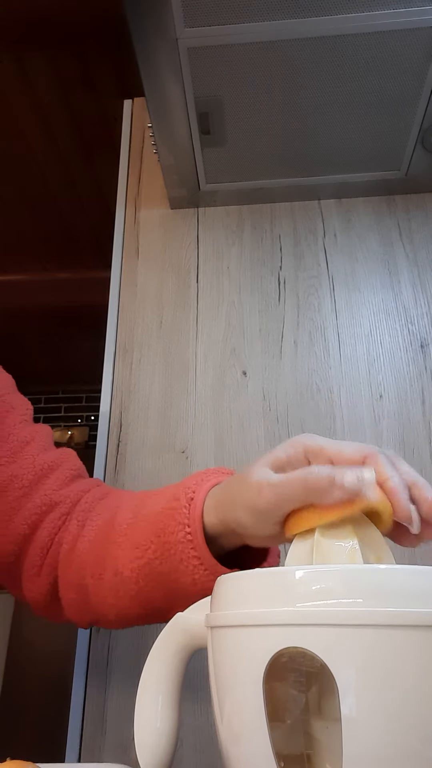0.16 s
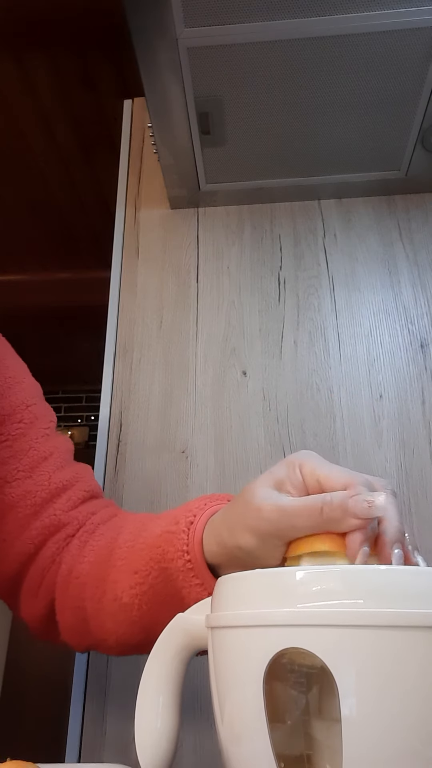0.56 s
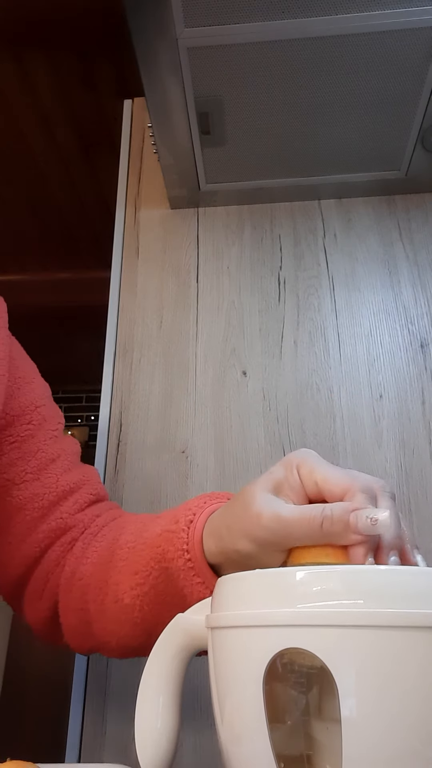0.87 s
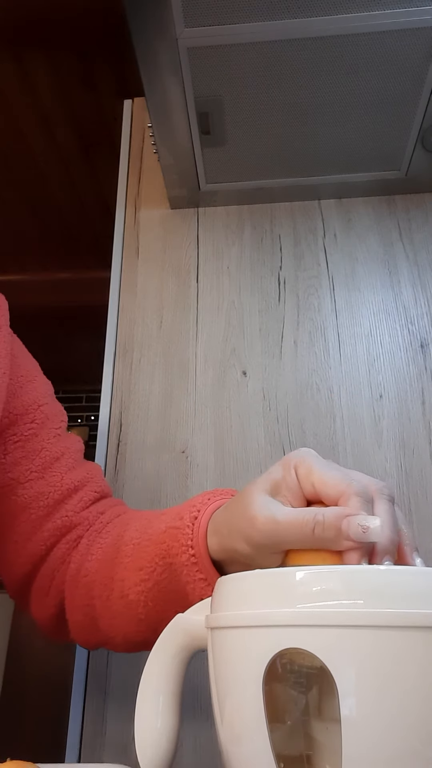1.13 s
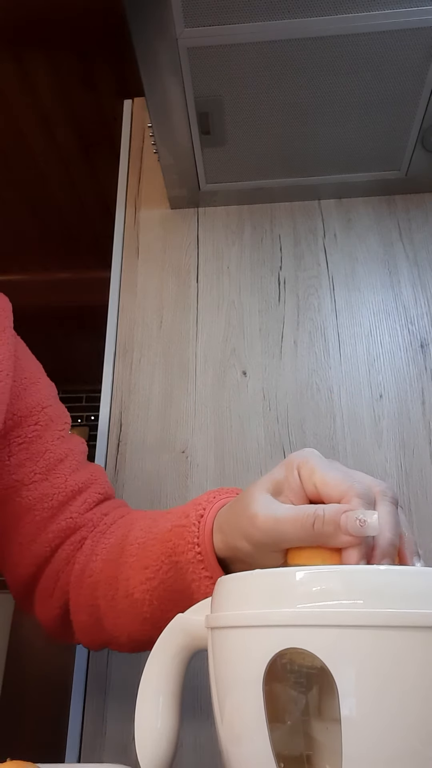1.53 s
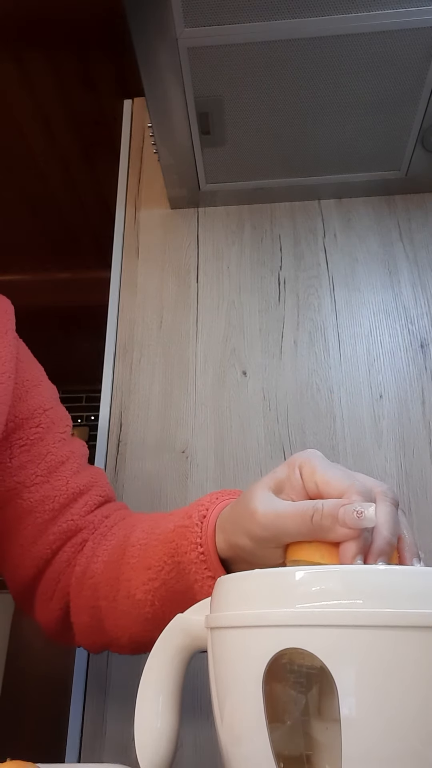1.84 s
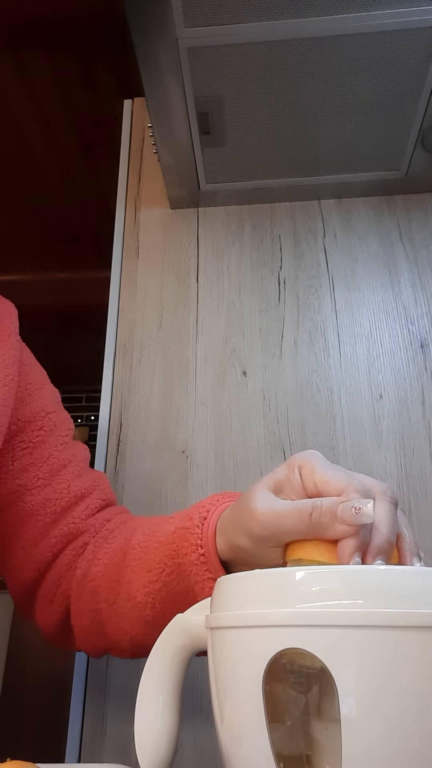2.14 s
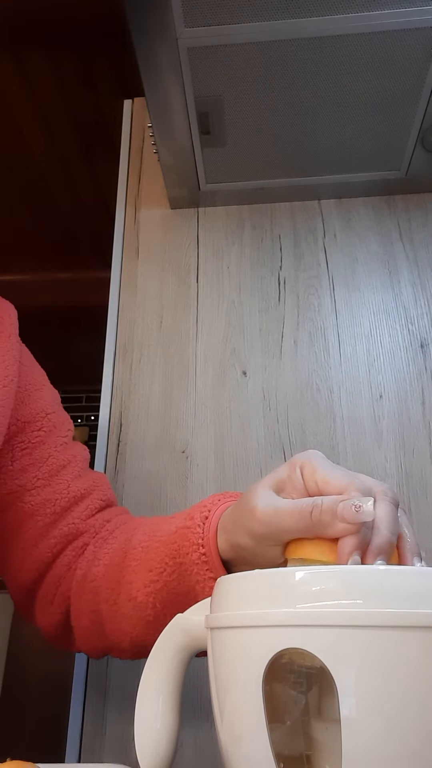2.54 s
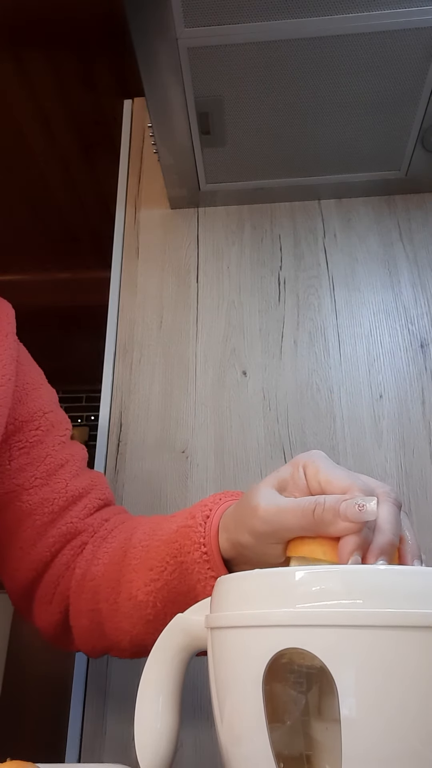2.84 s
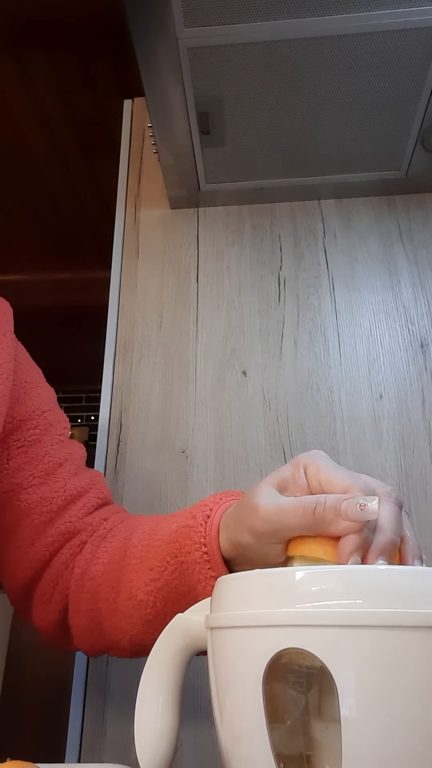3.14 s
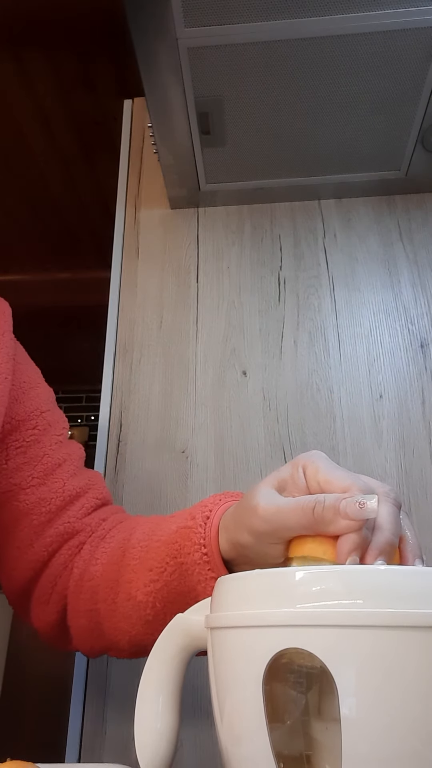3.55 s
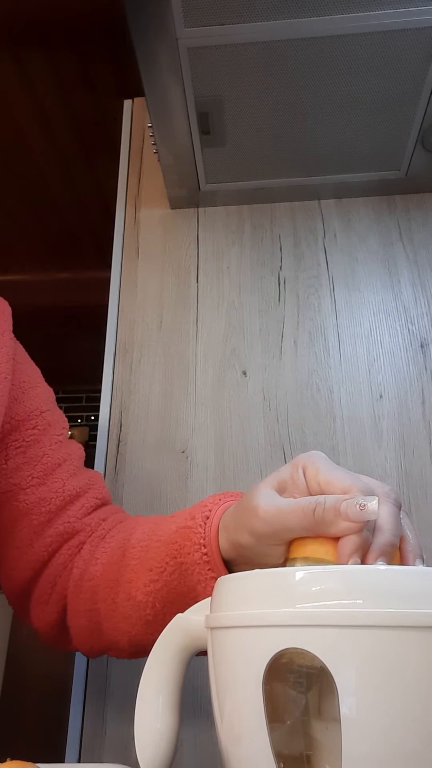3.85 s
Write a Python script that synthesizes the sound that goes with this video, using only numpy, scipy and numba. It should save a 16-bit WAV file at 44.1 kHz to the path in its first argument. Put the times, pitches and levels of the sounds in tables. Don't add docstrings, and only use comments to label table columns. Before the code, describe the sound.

Small electric juicer buzzes and rattles steadily after faint fruit touches and a brief stuttering start

```python
import sys
import numpy as np
from scipy import signal
from scipy.io import wavfile
from scipy.ndimage import uniform_filter1d
from numba import njit

SR = 44100
rng = np.random.default_rng(int(sys.argv[2]) if len(sys.argv) > 2 else 0)


def to_linear_factor(level_db):
    exponent = np.asarray(level_db, float) / 20
    return 10 ** exponent


def output_pcm(signal):
    pcm = np.clip(np.atleast_2d(signal).T, -1, 1) * 32767
    wavfile.write(sys.argv[1], SR, np.round(pcm).astype(np.int16))


N = 176400

BUZZ_HZ, BUZZ_AT_S = 100.05, 2.2
START_S, START_RISE_S = 0.2928, 0.017
RIGHT_LEAD_S = .00024


@njit
def svf(x, hz, width):
    y, band, low = np.empty(len(x)), 0., 0.
    g, damping = np.tan(np.pi * hz / SR), width / hz
    for i in range(len(x)):
        v = (band + g * (x[i] - low)) / (1 + g * (g + damping))
        band = 2 * v - band
        low = low + 2 * g * v
        y[i] = damping * v
    return y


def steep(x, hz, width):
    once = svf(x, 1. * hz, 1. * width)
    return svf(once, 1. * hz, 1. * width)


def walk(rate):
    k = int(SR / rate)
    held = np.repeat(rng.standard_normal(N // k + 1), k)
    return 1.225 * uniform_filter1d(uniform_filter1d(held, k), k)[:N]


def ramp(t, start_s, rise_s):
    return np.clip((t - start_s) / rise_s, 0, 1)


def burst(t, start_s, hold_s, attack_s, release_s):
    attack = ramp(t, start_s - attack_s, attack_s) ** 2
    return attack * np.exp(-np.maximum(t - start_s - hold_s, 0) / release_s)


def ports(x, left_db, right_db, lead_s):
    early = np.roll(x, -int(round(lead_s * SR)))
    return np.array([to_linear_factor(left_db) * x, to_linear_factor(right_db) * early])


def motor(t):
    # start_s, length_s, housing_db, gears_db
    stutters = [
        (0.316, .012, 9.5, 10),
        (0.357, 0.0076, 5.5, 11.5),
        (0.38, 0.012, 6.5, 11),
        (0.416, 0.0074, 0, -26),
        (0.428, .014, 5, 2),
        (0.457, 0.011, 2.5, -15),
        (0.476, 0.0043, -1.5, -18),
        (0.505, .006, -4, -9),
    ]
    # centre_hz, width_hz, left_db, right_db
    shell = [(122, 43.3, -25, -17), (403, 76.6, -19, -16), (627.4, 126, -13.5, -14), (801, 179, -18, -14),
             (1176, 90, -17.5, -11), (1318, 87, -11.5, -9), (1571, 106, -17.5, -11.5),
             (1913, 117, -26, -9.5), (2192, 95, -18, -11.5), (2537, 168, -54.5, -16.5),
             (2827, 112, -23.5, -9.5)]
    # centre_hz, width_hz, left_db, right_db
    gear_case = [(3373, 340, -32, -33.0), (4070, 294, -38.5, -37), (4574, 224, -45, -25.5),
                 (5284, 265, -33.5, -23.5), (5640, 330, -41, -26), (6500, 480, -34.5, -23.5),
                 (7115, 430, -32.5, -41.5), (7250, 470, -49.5, -30.5), (8590, 320, -47, -37),
                 (9320, 540, -70, -39), (11000, 920, -93, -49), (12700, 2500, -62, -49.5),
                 (14700, 1300, -68, -53)]
    turn = 2 * np.pi * BUZZ_HZ * (t - BUZZ_AT_S) + 0.0074 * walk(1.48)
    start = ramp(t, START_S, START_RISE_S) ** 4
    spin_up_db = -3.5 * (1 - ramp(t, 0.45, 0.16))
    base = start * to_linear_factor(spin_up_db + 0.61 * walk(1.52))
    low, high = 0, 0
    for start_s, length_s, housing_db, gears_db in stutters:
        shape = burst(t, start_s, length_s, attack_s=.006, release_s=.0025)
        low = low + to_linear_factor(housing_db) * shape
        high = high + to_linear_factor(gears_db) * shape

    housing = rattle(turn, shell[:7], base + 0.63 * low, depth=0.4, second=0.05, teeth=0.0092,
                     offset=1.82, apart=0.27, scatter_db=0.55, repeat=0.35, uneven_db=0.33)
    upper = rattle(turn, shell[7:], base + high, depth=.58, second=-.24, teeth=0.045,
                   offset=1.35, apart=1.0, scatter_db=0.15, repeat=0.38, uneven_db=1.2)
    gears = rattle(turn, gear_case + [(15700, 500, -62, -55)], base + high, depth=0.21, second=0.033,
                   teeth=0.17, offset=0.44, apart=1.0, scatter_db=0.5, repeat=0.16, uneven_db=-0.27)
    return buzz(t, turn) + rumble(start), housing + upper + gears + cone_knock(low)


def buzz(t, turn):
    # multiple, left_db, right_db
    lines = [(0.5, -87, -74), (1, -32, -32), (2, -70.5, -46.5), (3, -50.5, -60.5), (3.5, -61, -54.5),
             (4, -34, -36.5), (5, -49.5, -41.5), (6, -36.5, -28), (6.5, -96, -52.5), (7, -31.5, -29.5),
             (8, -32.5, -31.5), (8.5, -41.5, -43), (9, -68, -74.5), (10, -53, -41.5), (11, -47.5, -59.5),
             (12, -31, -68.5), (12.5, -99, -36.5), (13, -60, -39.5), (13.5, -37, -57.5), (14, -87, -40.5),
             (16, -45, -61), (17, -74, -43), (18, -39, -35.5), (19, -73.5, -43), (20, -81, -36.5),
             (21, -38.5, -49.5), (22, -75, -46)]
    # time_s, level_db
    load = [(0.42, -49), (0.5, -29.5), (0.62, -29), (0.8, -36), (1.09, -32.5), (1.43, -31.5), (1.67, -32),
            (1.86, -36.5), (2.12, -32), (2.62, -33.5), (2.69, -32.5), (3.06, -35.5), (3.22, -31.5),
            (3.61, -30.5), (3.64, -34), (3.83, -32), (3.97, -34), (4.0, -33.5)]
    settling = {3: -2.5, 4: -.6, 6: -2.3, 7: 1.1, 9: 1.5, 12: 1.2, 13: 1.2, 18: 2.2, 21: 2.2}
    pull_db = np.interp(t, *np.array(load).T) + 33.5
    locked = ramp(t, .45, 0.16)
    out = 0
    for k, left_db, right_db in lines:
        k = round(2 * k) / 2
        waver = (0.031 * k + 0.47 * (k % 1 > 0)) * walk(12)
        if k == 1:
            gain = to_linear_factor(pull_db + 1.1 * walk(15)) * ramp(t, START_S, START_RISE_S)
        else:
            drift_db = settling.get(k, 0) * (t - BUZZ_AT_S)
            wander_db = 1.75 * walk(3.1) + 0.7 * walk(16)
            gain = to_linear_factor(0.36 * pull_db + drift_db + wander_db) * locked
        phase = k * turn + .6 * np.tanh(k - 5.5) - 0.44 * max(k - 8, 0) + waver
        tone = np.sqrt(2) * gain * np.cos(phase)
        out = out + ports(tone, left_db, right_db, RIGHT_LEAD_S)
    return out


def rattle(turn, body, drive, depth, second, teeth, offset, apart, scatter_db, repeat, uneven_db):
    cycle = np.floor((turn - offset) / (2 * np.pi) + .5).astype(int)
    scatter = to_linear_factor(scatter_db * rng.standard_normal(N // 100))[cycle - cycle.min()]
    size = scatter * to_linear_factor(uneven_db * (-1.) ** cycle)
    swing = depth * np.cos(turn - offset) + second * np.cos(2 * (turn - offset))
    gate = np.exp(swing + teeth * np.cos(6 * turn))
    gate = gate * uniform_filter1d(size, size=90)
    gate = drive * gate / np.sqrt(np.mean(gate ** 2))
    shared, own = gate * clatter(repeat)
    out = 0
    for k, (hz, width, left_db, right_db) in enumerate(body):
        flicker = to_linear_factor(0.15 * walk(6.13))
        ring = (-1) ** k * flicker * steep(shared, hz, 1.61 * width)
        both = ports(ring, left_db, right_db, RIGHT_LEAD_S)
        both[0] += apart * min(hz / 900, 1) * to_linear_factor(left_db) * flicker * steep(own, hz, 2 * width)
        out = out + both
    return out


def clatter(repeat):
    shaft_samples = 882
    repeat = np.clip(repeat, 0, .9)
    turns = rng.standard_normal((2, N // shaft_samples + 1, shaft_samples))
    blended = signal.lfilter([np.sqrt(1 - repeat ** 2)], [1, -repeat], turns, axis=1)
    return blended.reshape(2, -1)[:, :N]


def cone_knock(stutter):
    # centre_hz, width_hz, level_db
    cone_modes = [(327, 33, -15), (407, 88, -5), (810, 280, -12), (1580, 82, -6), (2270, 330, -6.5)]
    push = stutter * rng.standard_normal(N)
    knock = sum(to_linear_factor(db) * steep(push, hz, width) for hz, width, db in cone_modes)
    return ports(knock, -0.27, 0.25, RIGHT_LEAD_S)


def rumble(start):
    return steep(rng.standard_normal(N), 54, 32) * start * to_linear_factor(-45.5 + 23.5)


def spits(t):
    # start_s, peak_db, centre_hz, decay_s
    spit_events = [(.3869, -38, 12800, .004), (0.506, -26, 11700, .002), (0.5064, -20, 6500, 0.0023),
                   (0.604, -23, 13200, 0.0075), (.754, -34, 13800, 0.0058), (.8927, -30, 13600, .005),
                   (1.1656, -33, 14500, .006), (1.5707, -36, 11000, .003), (1.8585, -34, 12700, .004),
                   (2.4427, -47, 12000, .004), (2.5789, -43, 11000, .003)]
    length = SR // 5
    span = np.arange(length) / SR
    out = np.zeros((2, N + length))
    for start_s, db, hz, decay_s in spit_events:
        noise = rng.standard_normal((2, length)) * burst(span, .001, .001, .001, decay_s)
        hiss = np.array([steep(side, hz, 0.52 * hz) for side in noise])
        first = int(start_s * SR)
        out[:, first:first + length] += to_linear_factor(db) * hiss
    return out[:, :N] * to_linear_factor(np.array([[-10], [3.0]]))


def touches(t):
    # start_s, level_db, decay_s
    touch_events = [
        (0.036, -59, 0.016),
        (.055, -79, .02),
        (.165, -71, .015),
        (0.201, -63, 0.021),
        (.25, -59, 0.015),
        (.27, -59, 0.022),
        (0.289, -51, 0.016),
    ]
    # centre_hz, width_hz, level_db
    jug = [(95, 35, -12), (430, 25, 3), (760, 150, -12), (1410, 730, -18.5), (2700, 480, -35),
           (8050, 5000, -35)]
    pressure = sum(to_linear_factor(db) * burst(t, start_s, 0.0028, 0.0049, decay_s) for start_s, db, decay_s in touch_events)
    push = rng.standard_normal(N) * pressure
    ring = sum(to_linear_factor(db + 23.5) * steep(push, hz, 1.7 * width) for hz, width, db in jug)
    return ports(ring, 0, 0, RIGHT_LEAD_S)


def kitchen(x):
    room_db, t60_s = -13, .25
    t = np.arange(SR // 3) / SR
    decay = np.exp(-np.log(1000) * t / t60_s) * (t > .004)
    tail = rng.standard_normal((2, len(t))) * decay
    tail = signal.sosfilt(signal.butter(2, 350, "high", fs=SR, output="sos"), tail)
    tail = tail / np.sqrt(np.sum(tail ** 2, axis=1, keepdims=True))
    return to_linear_factor(room_db) * signal.fftconvolve(x, tail, axes=1)[:, :N]


def quiet_floor():
    murmur = svf(rng.standard_normal(N), 95., 40.)
    return to_linear_factor(-90) * (rng.standard_normal((2, N)) + 22 * murmur)


def scene():
    t = np.arange(N) / SR
    tones, noise = motor(t)
    near = noise + spits(t) + touches(t)
    return tones + near + kitchen(near) + quiet_floor()


def roll_off(x):
    return signal.sosfilt(signal.butter(12, 15800, fs=SR, output="sos"), x)


def record(dry):
    mix = np.tanh(1.1 * dry) / 1.1
    return roll_off(mix)


dry = scene()
out = record(dry)
output_pcm(out)
```